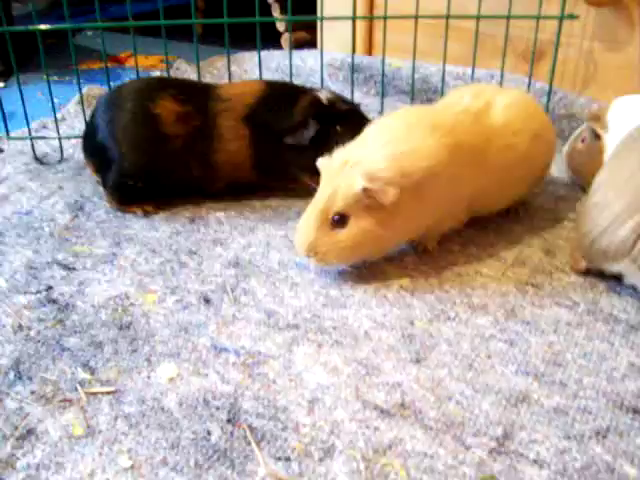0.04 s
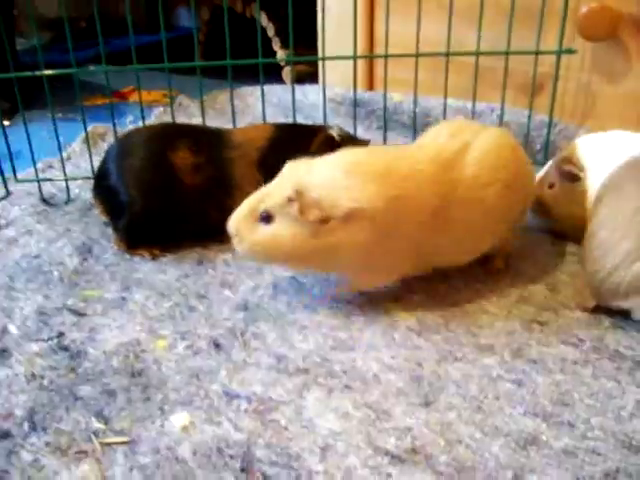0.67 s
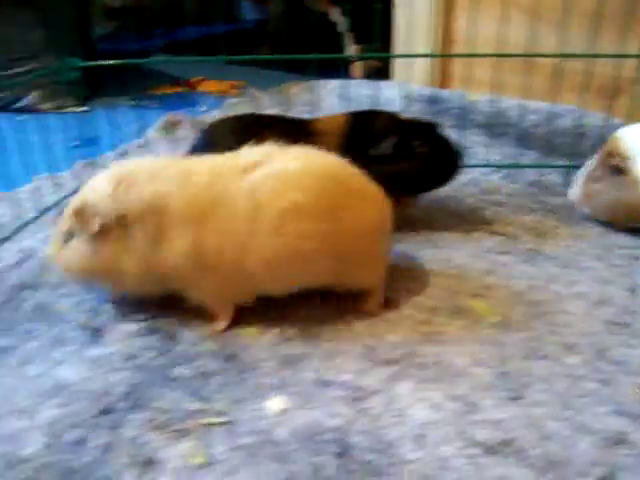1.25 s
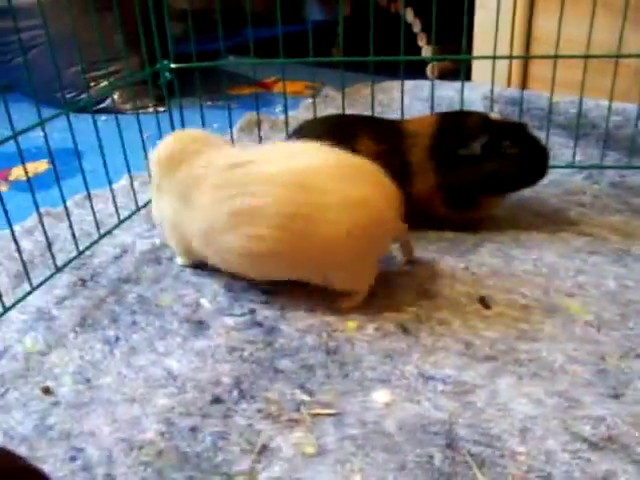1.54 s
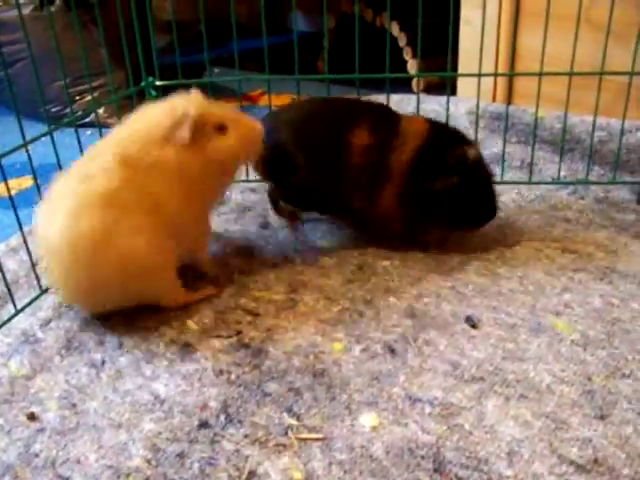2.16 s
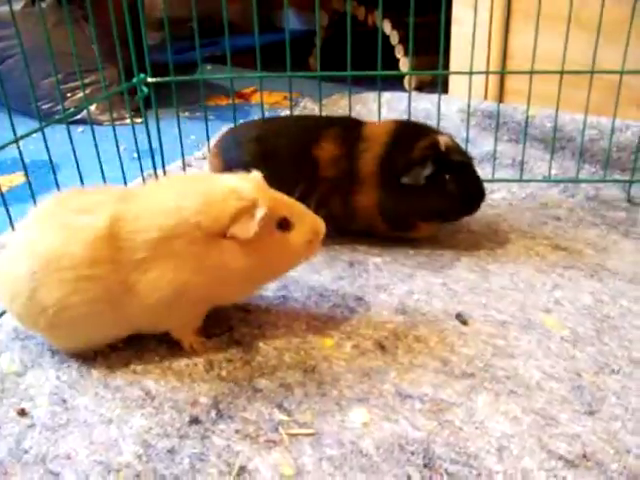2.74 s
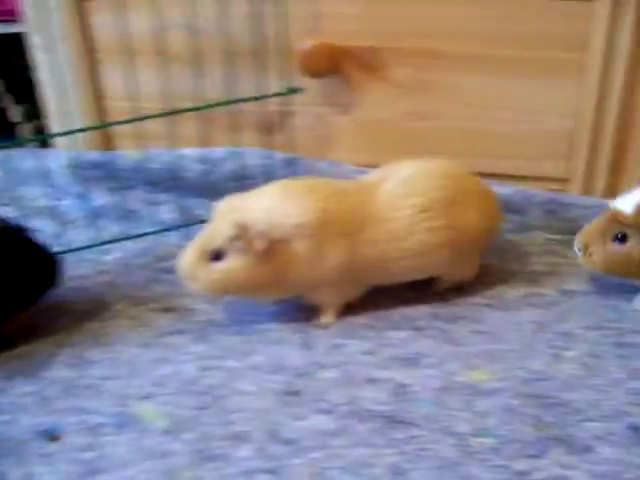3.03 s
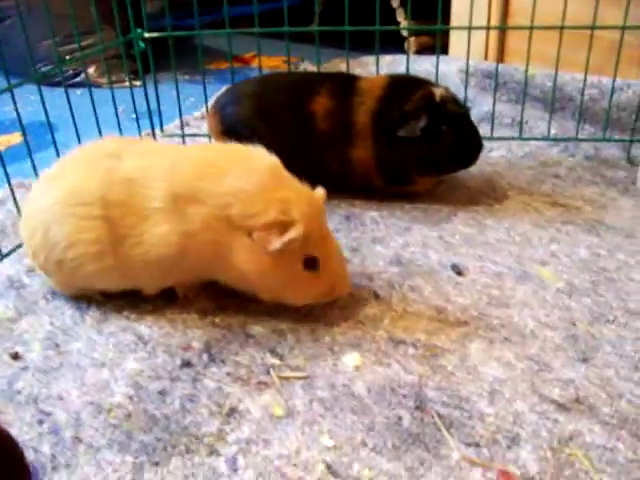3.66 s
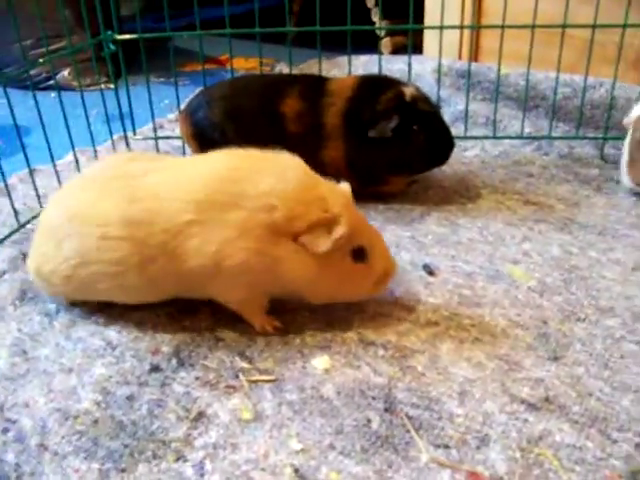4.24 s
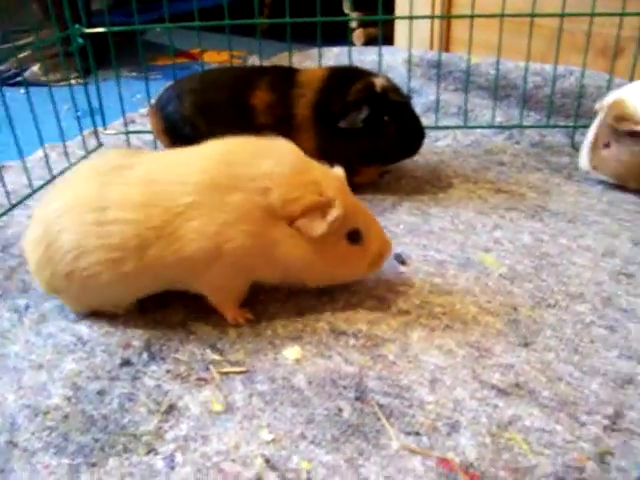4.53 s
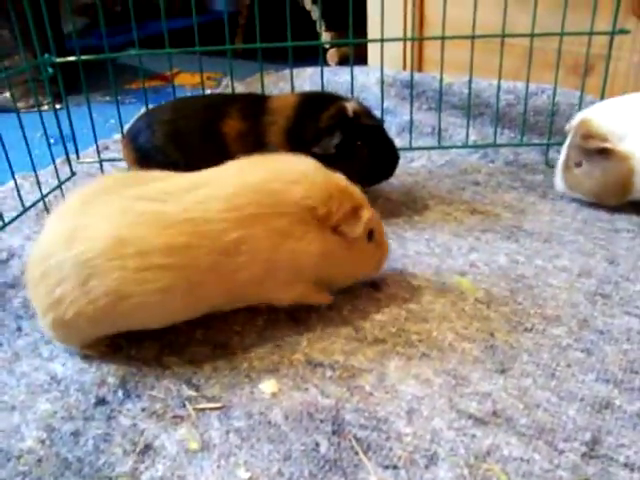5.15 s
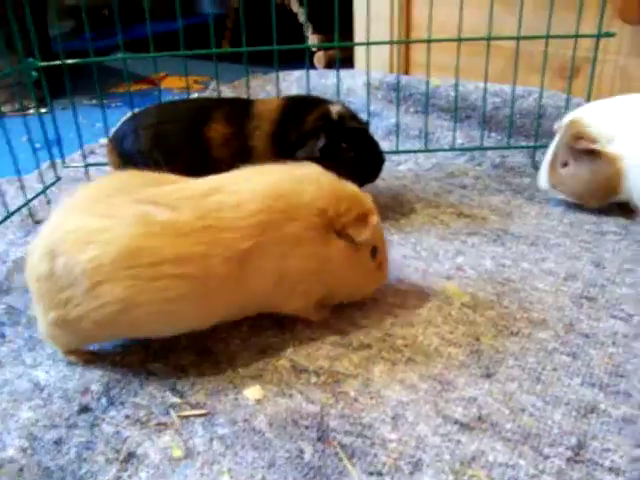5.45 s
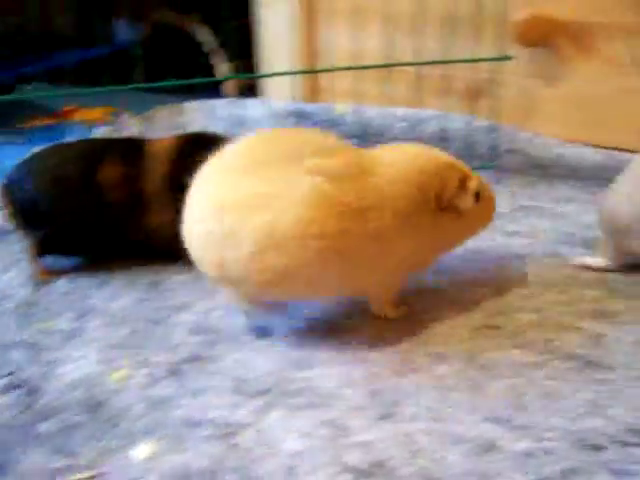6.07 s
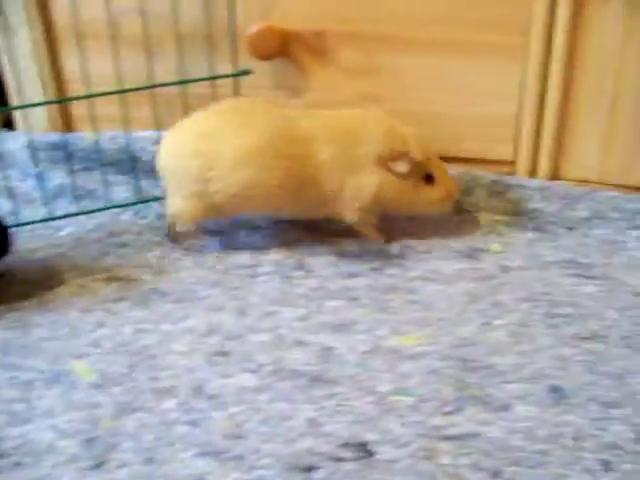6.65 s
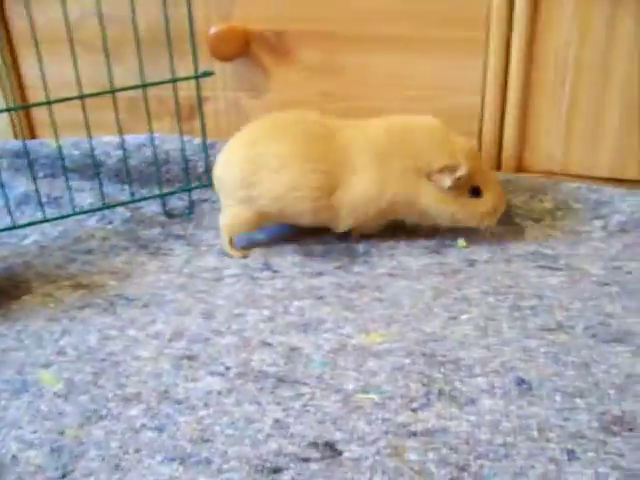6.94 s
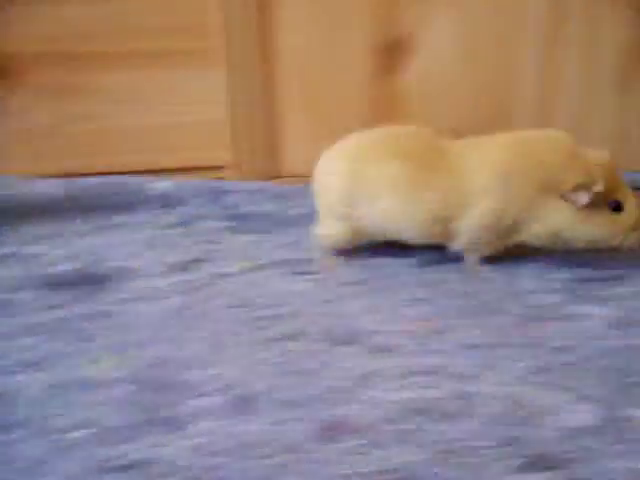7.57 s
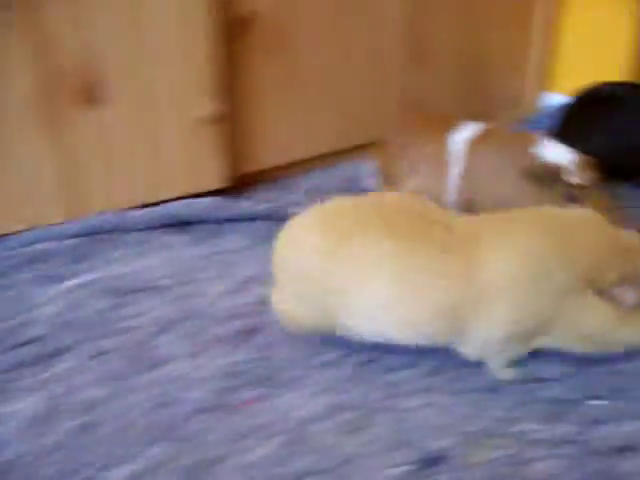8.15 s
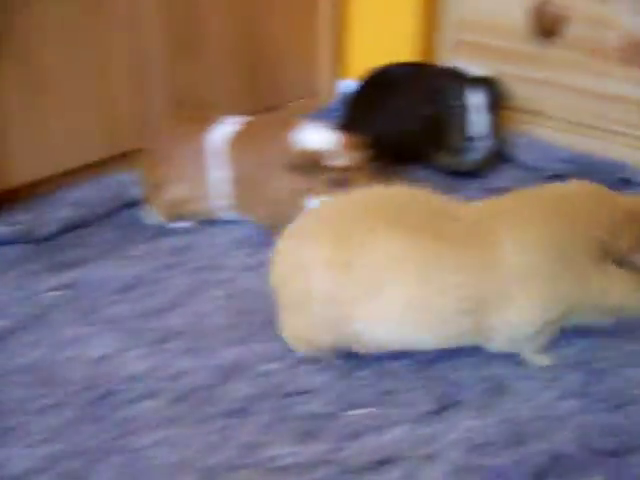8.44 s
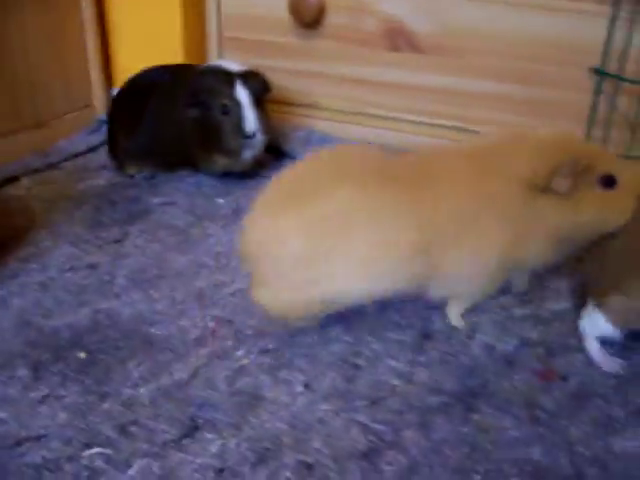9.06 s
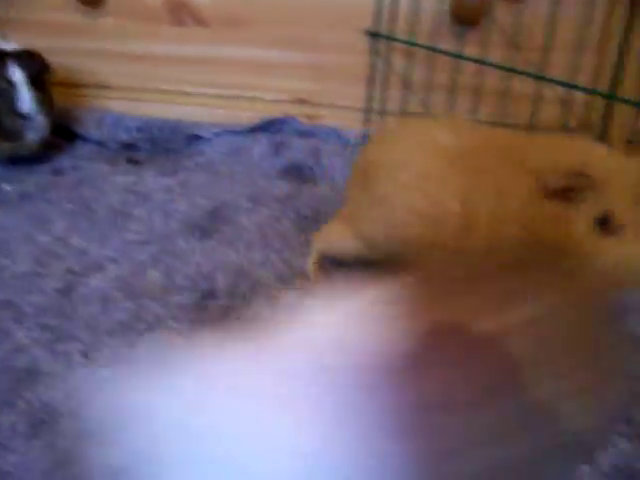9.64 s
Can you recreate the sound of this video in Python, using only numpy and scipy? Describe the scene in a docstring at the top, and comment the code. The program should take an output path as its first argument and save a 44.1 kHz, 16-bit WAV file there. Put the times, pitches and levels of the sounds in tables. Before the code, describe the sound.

A guinea pig squeals in swooping phrases indoors, with low purrs, short hoarse clucks, soft paw steps and a sharp click.

```python
"""A guinea pig squeals in phrases, close by on a rug in a small room: a low opening note sweeps up toward
a thin whistle and swoops down again and again. Around the phrases come short, hoarse clucks and a weak,
quavering whimper, perhaps from a second guinea pig. Each call is gliding vocal folds heard through a
fixed throat colour. A strutting male purrs in bursts of low throbs. Paws pad and rustle, something clicks
sharply, and under it all lie room rumble, hiss and a faint electronic whine."""
import sys
import numpy as np
from scipy import signal
from scipy.fft import rfft, irfft, next_fast_len
from scipy.io import wavfile
from scipy.ndimage import uniform_filter1d, map_coordinates

SR = 44100
rng = np.random.default_rng(int(sys.argv[2]) if len(sys.argv) > 2 else 0)


def wav_record(signal):
    """Record a signal, one row per channel, as 16-bit PCM in the file named by sys.argv[1]."""
    frames = np.transpose(np.atleast_2d(signal))
    bounded = np.clip(frames, -1, 1)
    # unit amplitude maps onto the largest positive 16-bit level
    quanta = np.round(bounded * 32767).astype(np.int16)
    wavfile.write(sys.argv[1], SR, quanta)


N = 432180
TOP_HZ = 10200  # upper edge of the sound


def amp(db):
    """Decibels to gain."""
    return 10 ** (np.asarray(db) / 20)


def unit(x):
    """Scale to rms 1."""
    return x / np.sqrt(np.mean(x ** 2) + 1e-20)


def along(points, hz):
    """Read (Hz, value) points on a log frequency axis."""
    freqs, values = np.transpose(points)
    return np.interp(np.log(hz + 1), np.log(freqs + 1), values)


def curves(rows, t):
    """Each column after the time, read at the times t."""
    times, *columns = np.transpose(rows)
    return [np.interp(t, times, column) for column in columns]


def wobble(rate, size):
    """A smooth random curve, rate knots a second."""
    knots = rng.standard_normal(int(size * rate / SR) + 4)
    return map_coordinates(knots, [np.arange(size) * rate / SR])


def filtered(x, response):
    """Filter x by a gain given as a function of Hz."""
    size = next_fast_len(len(x) + 4096)
    return irfft(rfft(x, size) * response(np.fft.rfftfreq(size, 1 / SR)), size)[:len(x)]


def coloured(x, spectrum):
    """x with the given colour, at rms 1."""
    return unit(filtered(x, lambda hz: amp(along(spectrum, hz))))


def add(track, start, x):
    """Mix x into the track at start seconds."""
    part = track[int(start * SR):]
    part[:len(x)] += x[:len(part)]


def span(start, end):
    """The sample times from start to end."""
    return np.arange(int(start * SR), int(end * SR)) / SR


# Colour of the room tone. Each row: frequency in Hz, level in dB.
ROOM_TONE = [(12, -31.5), (20, 13.5), (41, 0.5), (369, -16), (1190, -23), (1840, -29), (4070, -33),
             (5540, -38.5), (5980, -33.5), (7340, -37.5), (9000, -59.5), (11700, -82), (19800, -120)]


def background(hiss_db=-46, whine_hz=5821, whine_db=-67):
    """Steady room rumble and hiss, with a thin electronic whine."""
    whine = np.sqrt(2) * np.sin(2 * np.pi * whine_hz * np.arange(N) / SR)
    hiss = coloured(rng.standard_normal(N), ROOM_TONE)
    return amp(hiss_db) * hiss + amp(whine_db) * whine


# The room's decay. Each row: frequency in Hz, seconds to fall 60 dB.
ROOM_DECAY = [(200, 0.24), (1000, 0.25), (3000, 0.52), (9000, 0.11)]


def room(x, wet_db, early_db, echoes=10):
    """Close wooden fronts echo first, then the room dies away."""
    hz, t, noise = signal.stft(rng.standard_normal(SR // 2), SR, nperseg=256)
    decay = amp(-60 * t / along(ROOM_DECAY, hz)[:, None])
    tail = unit(signal.istft(noise * decay, SR, nperseg=256)[1])
    response = np.pad(amp(wet_db) * tail / np.sqrt(len(tail)), (SR // 200, 0))  # 5 ms pre-delay
    echo_delays = (rng.uniform(.002, .014, size=echoes) * SR).astype(int)
    response[echo_delays] += amp(early_db) / np.sqrt(echoes)
    return x + signal.fftconvolve(x, response)[:N]


# Colours of dull padding and of crisp bedding. Each row: frequency in Hz, level in dB.
PADDING_COLOUR = [(30, -7.5), (85, 5), (200, -10.5), (450, -11), (1200, -39.5)]
BEDDING_COLOUR = [(200, -3), (700, 0), (1400, -7), (2000, 5), (3000, -6), (4500, -2), (7200, -1.5),
                  (9000, -15.5)]
# Bustle on the rug. Each row: time in seconds, padding level in dB, rustle level in dB.
BUSTLE = [(.4, -51, -67.5), (1.7, -68, -58.5), (2.25, -64, -55.5), (3.4, -56.5, -60), (7, -62, -59),
          (8.1, -43.5, -55.5), (9, -43.5, -58), (9.8, -42.5, -53.5)]
# A brief, shrill hiss. Each row: time of the peak in seconds, level in dB, half-width in seconds.
SCRAPES = [(1.961, -38.5, 0.016)]


def movement(lumpy_db=3, grain_db=3, surge_db=3.3):
    """Dull padding on the rug and a grainy rustle of fur and bedding, with one hissing scrape."""
    t = np.arange(N) / SR
    padding_db, rustle_db = curves(BUSTLE, t)
    padding = unit(coloured(rng.standard_normal(N), PADDING_COLOUR) * amp(lumpy_db * wobble(20, N)))
    grains = rng.standard_normal(N) * amp(grain_db * wobble(500, N) + surge_db * wobble(20, N))
    rustle = coloured(grains, BEDDING_COLOUR)
    scrape_swell = sum(amp(db) / (1 + ((t - peak) / width) ** 2) for peak, db, width in SCRAPES)
    fizz = coloured(grains, [(2500, -25), (6800, 3.5), (9000, -7)])
    return amp(padding_db) * padding + amp(rustle_db) * rustle + scrape_swell * fizz


# Soft steps and bumps. Each row: start in seconds, level in dB, centre frequency in Hz.
FOOTFALLS = [(1.029, -31.5, 80.5), (1.218, -34.5, 85.4), (2.69, -41.5, 85), (4.53, -32, 85),
             (6.491, -38.5, 337), (6.678, -43, 269), (6.77, -36.5, 162), (6.88, -41.5, 304),
             (7.1, -40.5, 298), (7.259, -38, 227), (7.97, -32.5, 123), (8.161, -36.5, 112),
             (8.33, -43.5, 131), (8.452, -43.5, 251.4), (8.646, -34, 87.4), (8.83, -39, 140),
             (8.89, -40, 91.8), (9.1, -31.5, 99), (9.28, -34.5, 91), (9.391, -45, 300), (9.62, -45, 300)]


def footfalls(rise_s=0.02, spread=0.318):
    """The rug cushions each step into a dull, pitchless bump."""
    out, t = np.zeros(N), span(0, 0.2)
    bump = t / rise_s * np.exp(1 - t / rise_s)
    for start, db, hz in FOOTFALLS:
        smeared_hz = hz * np.exp(spread * wobble(hz, len(t)))
        phase = 2 * np.pi * np.cumsum(smeared_hz) / SR
        add(out, start, amp(db) * bump * np.sin(phase))
    return out


# Sharp clicks and knocks. Each row: start in seconds, level in dB, low-pass corner in Hz.
CLICKS = [(4.8851, -6.5, 9000), (8.6426, -10, 1570)]
# The ring of a click. Each row: frequency in Hz, level in dB, seconds to fall 60 dB.
CLICK_MODES = [(875, -5, 0.013), (1345, -6, 0.018), (2220, 0.5, 0.013), (2920, -4.5, 0.0095),
               (3360, 5.5, 0.0056), (4620, -7, 0.015), (7170, -12, 0.013)]
# Light ticks of claws and hay. Each row: start in seconds, level in dB.
TICKS = [(0.437, -32.5), (7.5288, -26.5), (8.668, -32), (9.312, -23.5), (9.4446, -24.5), (9.668, -24.5)]


def clicks(ring_db=-7, crack_db=-12, crack_t60=0.013, tick_db=-8, tick_t60=0.017):
    """Hard little contacts: a crack and a short ring, duller when soft; the lightest ones only tick."""
    out, t = np.zeros(N), span(0, 0.1)
    attack = 1 - np.exp(-t / 0.00024)
    for start, db, corner_hz in CLICKS:
        ring = sum(amp(mode_db - 60 * t / t60) * np.sin(2 * np.pi * (hz * t + rng.random()))
                   for hz, mode_db, t60 in CLICK_MODES)
        noise = coloured(rng.standard_normal(len(t)), BEDDING_COLOUR)
        hit = attack * (amp(ring_db) * ring + amp(crack_db - 60 * t / crack_t60) * noise)
        softened = filtered(hit, lambda hz: 1 / (1 + 1j * hz / corner_hz - (hz / corner_hz) ** 2))
        add(out, start, amp(db) * softened)
    for start, db in TICKS:
        noise = coloured(rng.standard_normal(len(t)), BEDDING_COLOUR)
        add(out, start, amp(db + tick_db - 60 * t / tick_t60) * noise)
    return out


# Bursts of purring. Each row: time of the first throb in seconds, number of throbs, opening interval
# in seconds, opening pitch in Hz, then first, middle and last level in dB.
PURRS = [(.372, 11, .0587, 325, -37, -32.5, -32), (2.878, 1, .06, 407, -32, -32, -32),
         (3.085, 5, .0715, 335, -35, -37, -34), (4.037, 7, .058, 360, -37, -35, -33),
         (6.075, 2, .069, 410, -35, -35, -34), (6.294, 1, .06, 417, -38, -38, -38)]
# Breath in the purr. Each row: frequency in Hz, level in dB.
PURR_BREATH = [(200, -8), (430, 5), (700, -6.5), (1400, -5), (2200, -17.5), (6000, -44.5)]


def purr(throb_s=0.03, lead_s=.007, slowing=.015, rest_hz=278.2, settle_throbs=2.76,
         jitter=0.085, level_db=-2.5, rasp_db=-6):
    """Each throb is a few uneven low cycles with a rasp of air; a burst slows and sinks in pitch."""
    out, size = np.zeros(N), int(throb_s * SR)
    swell = np.sin(np.pi * np.arange(size) / size)
    for start, count, interval, first_hz, *contour_db in PURRS:
        k = np.arange(round(count))
        times = start + interval * k * (1 + slowing * k)
        levels = np.interp(np.linspace(0, 2, len(k)), [0, 1, 2], contour_db)
        pitches = rest_hz + (first_hz - rest_hz) * np.exp(-k / settle_throbs)
        for time, db, hz in zip(times, levels, pitches):
            phase = 2 * np.pi * np.cumsum(hz * (1 + jitter * wobble(190, size))) / SR
            rasp = coloured(rng.standard_normal(size) * (1 + np.cos(phase)) ** 2, PURR_BREATH)
            add(out, time - lead_s, amp(db + level_db) * swell * (np.sin(phase) + amp(rasp_db) * rasp))
    return out


# Tone of the calls. Each row: time in seconds, overtone slope in dB per octave, hoarseness from 0 to 1.
VOICE_TONE = [(.3, -15, 0.36), (1.02, -11, 0.13), (1.7, -10, 0.05), (2.35, -9, 0.09), (2.6, -9.5, 0.22),
              (2.87, -8.5, 0.26), (3.12, -9.5, 0.28), (3.25, -9, 0.23), (3.7, -9.5, 0.14), (4.9, -9, 0.05),
              (5.03, -8.5, 0.36), (5.17, -10, 0.07), (5.7, -10, 0.06), (6.3, -10, 0.2), (6.9, -8.5, 0.26),
              (7.5, -9, 0.39), (8.3, -13, 0.41), (9.8, -9, 0.52)]
# Colours of the throat and mouth, and of the breath in a call. Each row: frequency in Hz, level in dB.
THROAT = [(480, -3), (630, 0.5), (900, 2), (1200, 5), (1650, 3), (1880, -5), (2350, -0.5), (2950, 2),
          (3800, -6), (4600, -2.5), (5700, -3.5), (7300, 11.5), (8800, 4.5)]
CALL_BREATH = [(200, -11.5), (400, -3.5), (950, 5), (1550, -11), (2000, -13), (3100, -7.5), (4400, -19.5),
               (8500, -24)]
SETTLE_S = 0.01182  # clucks and phrases start sharp and settle with this time constant


def voice(t, glide, level_db, jitter=.045, quaver=0.0599, shimmer=1.11, air_db=-3, strain_hz=2100,
          thinning_db=9.5, pierce_db=7, falter_hz=2200, attack_s=0.0036, release_s=0.002):
    """One call: the vocal folds glide in pitch and their overtones sweep through the throat colour."""
    slope, hoarse = curves(VOICE_TONE, t)
    # up high the voice strains into a thin, ragged whistle; its lowest partial falters on the way there
    strain = 1 / (1 + (strain_hz / glide) ** 8)
    falter_db = 7 * np.exp(-(np.log(glide / falter_hz) / 0.21) ** 2)
    hoarse = hoarse + 0.22 * strain
    hz = glide * np.exp(hoarse * (jitter * wobble(500, len(t)) + quaver * wobble(90, len(t))))
    phase = 2 * np.pi * np.cumsum(hz) / SR
    order = np.arange(1, 16)[:, None]
    slope = slope + 0.12 * (level_db + 35) - thinning_db * strain  # louder calls are brighter
    source_db = slope * np.log2(order) - 0.55 * order + pierce_db * strain * (order == 2)
    wander_db = 3.5 * (order > 1) * np.array([wobble(49.27, len(t)) for _ in order])
    gains = amp(source_db + wander_db + along(THROAT, order * hz)) * (order * hz < TOP_HZ)
    gains /= np.linalg.norm(gains[:3], axis=0)
    gains[0] *= amp(-falter_db)
    flutter = 1 + shimmer * hoarse * np.array([wobble(249.75, len(t)) for _ in order])
    tone = np.sqrt(2) * np.sum(gains * flutter * np.sin(order * phase), axis=0)
    air = coloured(rng.standard_normal(len(t)) * (1 + np.cos(phase)), CALL_BREATH)  # one puff a cycle
    gate = np.clip((t - t[0]) / attack_s, 0, 1) * np.clip((t[-1] - t) / release_s, 0, 1)
    return gate * amp(level_db) * (tone + amp(air_db - falter_db) * hoarse * air)


# A low, rising grunt and a weak, quavering whimper. Each row: time in seconds, pitch in Hz, level in dB.
GRUNT = [(5.807, 472, -40.5), (5.834, 474, -35), (5.862, 714, -52)]
WHIMPER = [(3.155, 977, -41), (3.18, 871, -34.5), (3.215, 1154, -42), (3.25, 1048, -37.5), (3.29, 926, -36),
           (3.33, 945, -37), (3.37, 1103, -38), (3.392, 1173, -35.5), (3.412, 860, -44.5)]


def moans():
    """Soft notes that drift in pitch and level; yields times, pitch and level for the voice."""
    for contour in (GRUNT, WHIMPER):
        t = span(contour[0][0], contour[-1][0])
        glide, level_db = curves(contour, t)
        yield t, glide, level_db


# Thin whistles. Each row: start and length in seconds, first and last pitch in Hz, level in dB.
WHISTLES = [(0.363, 0.03, 2455, 2585, -44), (0.99, 0.036, 2480, 2295, -38), (1.93, 0.11, 2800, 3130, -49.5),
            (2.032, 0.16, 2930, 2744, -47), (2.697, .04, 2160, 2050, -43.5),
            (2.783, 0.036, 2750, 3410, -42.5), (2.904, 0.051, 2700, 3500, -48),
            (5.547, .04, 2543, 2536, -41.5), (5.826, 0.048, 2943, 2900, -41.5),
            (5.934, 0.078, 2964, 3055, -42.5), (6.255, .042, 3004, 2920, -35.5),
            (6.389, 0.056, 2870, 2787, -39)]


def whistles(swell_db=5.5):
    """The voice breaks at the top into high notes that slide a little, swelling and fading."""
    for start, length, hz, end_hz, db in WHISTLES:
        t = span(start, start + length)
        progress = np.linspace(0, 1, len(t))
        yield t, hz + (end_hz - hz) * progress, db - swell_db * (1 - np.sin(np.pi * progress))


# Short clucks. Each row: start and length in seconds, low and end pitch in Hz, onset and flick in dB.
CLUCKS = [(0.332, 0.029, 656, 1210, -34, -40.5), (0.437, 0.039, 677, 1180, -46, -40.5),
          (0.592, 0.072, 587, 1294, -46, -40), (0.711, 0.074, 629, 1410, -44.5, -39),
          (7.531, 0.094, 579, 1355, -35.5, -41.5), (7.683, 0.096, 521, 1115, -37.5, -30),
          (7.82, 0.094, 534, 1186, -37, -36), (7.952, 0.075, 575, 1133, -43.5, -36.5),
          (8.172, 0.074, 552.5, 1160, -40.5, -36), (8.472, 0.071, 592, 1097, -44.5, -41),
          (8.703, 0.081, 552, 1015, -46, -41.5), (9.034, 0.083, 563.5, 1007, -49, -38.5),
          (9.149, 0.044, 520, 1500, -33.5, -33), (9.223, 0.045, 543, 1405, -32.5, -34.5),
          (9.377, 0.041, 517, 1180, -31.5, -28.5), (9.521, 0.05, 504, 1306, -37, -34.5),
          (9.609, 0.055, 530.5, 1270, -31, -32.5), (9.767, 0.068, 534, 1240, -28, -30)]


def clucks(overshoot=0.0964, slump_db=3.5, flick_lateness=4.3):
    """Low notes that start hard, slump in level and flick upward in pitch."""
    for start, length, hz, end_hz, onset_db, flick_db in CLUCKS:
        t = span(start, start + length)
        progress = np.linspace(0, 1, len(t))
        flick = (end_hz / hz) ** (progress ** flick_lateness)
        settling = 1 + overshoot * np.exp((start - t) / SETTLE_S)
        level_db = onset_db + (flick_db - onset_db) * progress - slump_db * np.sin(np.pi * progress)
        yield t, hz * flick * settling, level_db


# Catches in the voice. Each row: start in seconds, return in seconds.
CATCHES = [(2.77, 2.845), (4.191, 4.22), (4.675, 4.718), (5.315, 5.3)]


def catches_db(t, depth_db=13, accent_db=4.5, accent_s=0.014):
    """The voice drops out and returns with an accent; a return set before its start only accents."""
    change_db = np.zeros(len(t))
    for start, back in CATCHES:
        accent = accent_db * np.exp(-np.abs(t - back) / accent_s)
        change_db += (t > start) * np.where(t < back, -depth_db, accent)
    return uniform_filter1d(change_db, size=200)


# Squealing phrases. Each row: start and end in seconds, opening pitch in Hz, seconds until halfway up,
# opening level in dB, swell of the opening note in dB.
PHRASES = [(0.902, 1.125, 646.4, 0.087, -45, 10), (1.287, 1.611, 600.6, 0.088, -39.5, -2.5),
           (1.741, 1.939, 593, 0.089, -43, 4), (2.319, 2.953, 589.0, 0.08, -36.5, 2.5),
           (3.056, 3.156, 612.5, 0.083, -36, 10), (3.545, 3.951, 553.0, 0.083, -37.5, -2),
           (4.079, 4.445, 556.0, 0.083, -37.5, 0.5), (4.565, 5.051, 536.6, 0.08, -35, -2),
           (5.172, 5.593, 548, 0.088, -34.5, 0), (5.672, 5.96, 587.6, 0.091, -34, 0),
           (6.083, 6.426, 620, 0.092, -29, 0.5), (6.545, 6.916, 584, 0.097, -34, 0.5),
           (7.032, 7.25, 558.4, 0.12, -39.5, 8), (7.367, 7.492, 537, 0.13, -39, 4)]
# Downward swoops within them. Each row: time of the bottom in seconds, bottom pitch in Hz, fall and
# rise in seconds, level in dB, swell on the way up in dB.
SWOOPS = [(1.083, 649, 0.04, 0.057, -40.5, 2.5), (1.436, 773, 0.026, 0.039, -39, -0.5),
          (1.475, 882, 0.023, 0.018, -38.5, -5.4), (1.571, 668, 0.063, 0.034, -40.5, -0.5),
          (2.528, 1448.0, 0.053, 0.052, -35.5, -1), (2.666, 1374, 0.034, 0.051, -35, -1.5),
          (2.774, 1354.0, 0.048, 0.005, -39.5, -5), (2.857, 1523, 0.033, 0.036, -30.5, 1.5),
          (3.718, 952, 0.067, 0.07, -38.5, 0.3), (3.846, 603, 0.04, 0.082, -35.5, -2),
          (4.24, 1096, 0.039, 0.031, -36.5, 1), (4.283, 1530, 0.051, 0.106, -37.0, 6.8),
          (4.371, 765, 0.025, 0.063, -34.5, -3.5), (4.761, 1107, 0.043, 0.056, -36.5, 0),
          (4.911, 1286, 0.16, 0.096, -36, -0.5), (5.068, 1607, 0.073, 0.015, -32.5, 5),
          (5.374, 1142, 0.036, 0.039, -33.5, 0.4), (5.494, 1547, 0.025, 0.064, -33.5, -2.5),
          (5.885, 1482, 0.019, 0.035, -30.5, -1), (6.309, 685, 0.022, 0.053, -28, -2.3),
          (6.703, 655, 0.031, 0.102, -33, -2.5), (6.843, 602.6, 0.048, 0.08, -33.5, 0),
          (7.21, 615.5, 0.071, 0.041, -34, 1)]


def squeals(ceiling_hz=3300, opening_flatness=5.2, swoop_flatness=2.8, overshoot=0.049,
            push_db=1.5, push_octaves=0.18, fade_db=11.5, fade_hz=1795, fade_skew=0.039):
    """The opening note and each swoop pull the pitch down from its ceiling; the strongest pull leads."""
    for start, end, opening_hz, climb_s, opening_db, opening_swell_db in PHRASES:
        t = span(start, end)
        offset = (t - start) / climb_s
        opening = np.log(ceiling_hz / opening_hz) / (1 + np.abs(offset) ** opening_flatness)
        pulls = [opening - overshoot * np.exp((start - t) / SETTLE_S)]
        notes = [(opening_hz, opening_db, opening_swell_db)]
        directions = [np.tanh(offset)]  # -1 falling, 1 rising
        for bottom, hz, fall_s, rise_s, db, swell_db in SWOOPS:
            if start < bottom < end + .03:
                offset = (t - bottom) / np.where(t < bottom, fall_s, rise_s)
                pulls.append(np.log(ceiling_hz / hz) / (1 + np.abs(offset) ** swoop_flatness))
                notes.append((hz, db, swell_db))
                directions.append(np.tanh(offset))
        weights = np.abs(pulls) ** 8  # a soft maximum of the pulls
        glide = ceiling_hz * np.exp(-weights.sum(0) ** (1 / 8))
        shares = weights / weights.sum(0)
        rising = shares * directions
        bottoms_hz, notes_db, swells_db = np.transpose(notes)
        # the voice is pushed hardest just above the bottom of a swoop
        lift = np.abs(np.log2(glide / (bottoms_hz @ shares))) / push_octaves
        sung_db = notes_db @ shares + swells_db @ rising + push_db * lift * np.exp(1 - lift)
        # it weakens at high pitch, sooner on the way up
        weak_above_hz = fade_hz * (1 - fade_skew * rising.sum(0))
        weakening_db = fade_db / (1 + (weak_above_hz / glide) ** 8)
        yield t, glide, sung_db - weakening_db + catches_db(t)


def calls():
    """Squeals, clucks, whistles and moans, each voiced and laid in at its start."""
    out = np.zeros(N)
    for t, glide, level_db in (*squeals(), *clucks(), *whistles(), *moans()):
        add(out, t[0], voice(t, glide, level_db))
    return out


def scene():
    """The animals in their room, over the background; the clicks are close and nearly dry."""
    voices = room(calls() + purr(), wet_db=-9.5, early_db=-10.5)
    contacts = room(clicks(), wet_db=-20.5, early_db=-33)
    return (amp(1.5) * voices + contacts + footfalls() + movement() + background())[None]


# The microphone's treble roll-off. Each row: frequency in Hz, gain in dB.
MIC_ROLLOFF = [(8300, -0.5), (9000, -5), (9600, -18.5), (10200, -38.5)]


def record(dry, on_s=.333, fade_in_s=.003):
    """The sound switches on after a third of a second; the microphone loses the top treble."""
    gate = np.clip((np.arange(N) / SR - on_s) / fade_in_s, 0, 1)
    return filtered(dry[0] * gate, lambda hz: amp(along(MIC_ROLLOFF, hz)) * (hz < TOP_HZ))[None]


dry = scene()
out = record(dry)
wav_record(out)
```